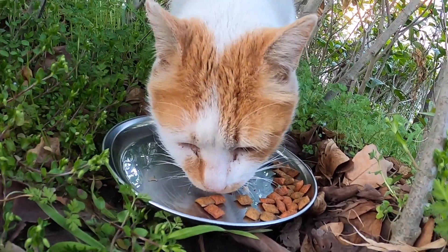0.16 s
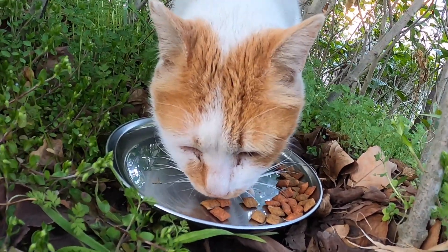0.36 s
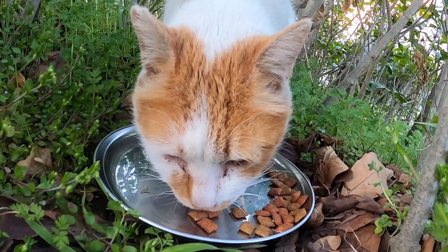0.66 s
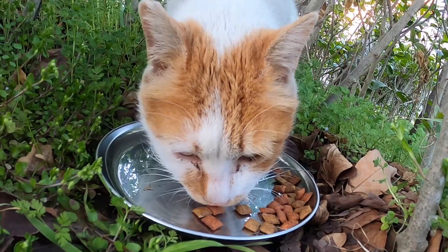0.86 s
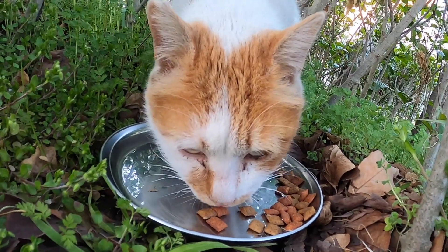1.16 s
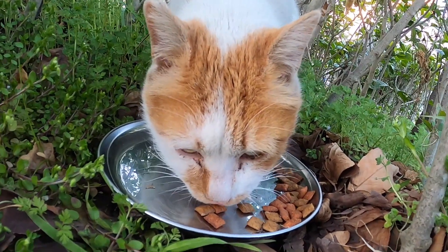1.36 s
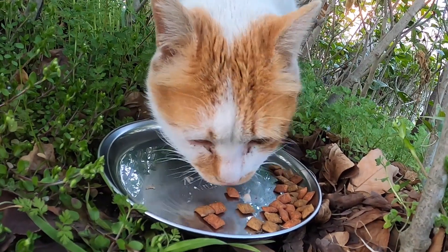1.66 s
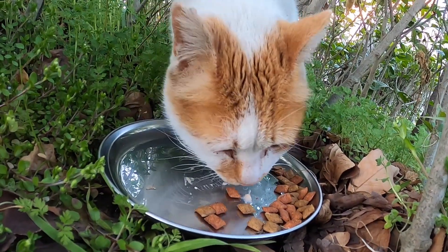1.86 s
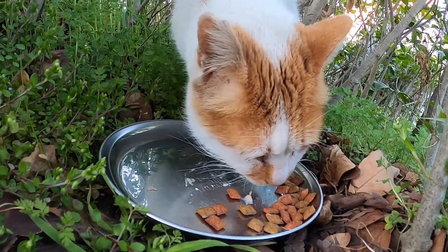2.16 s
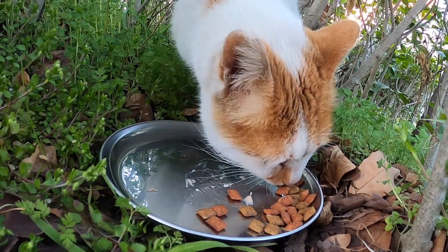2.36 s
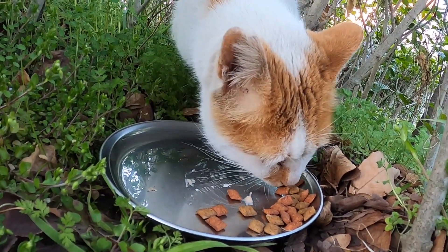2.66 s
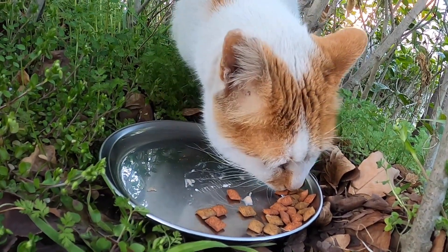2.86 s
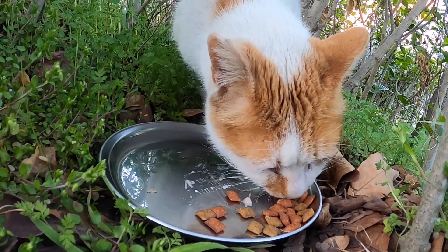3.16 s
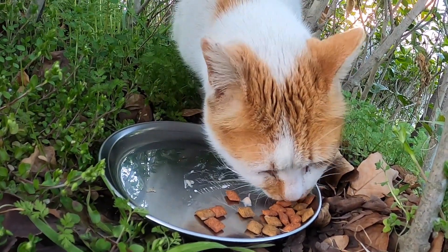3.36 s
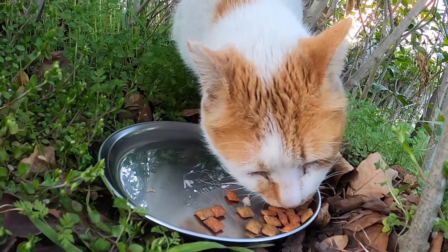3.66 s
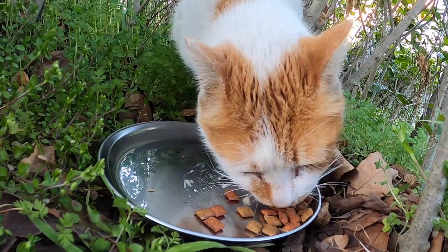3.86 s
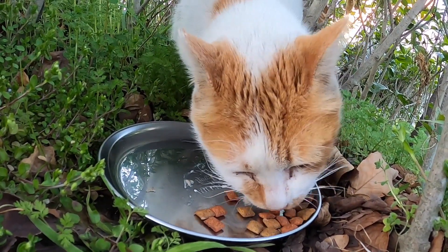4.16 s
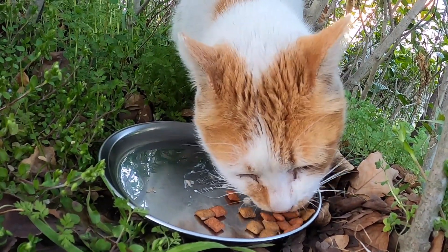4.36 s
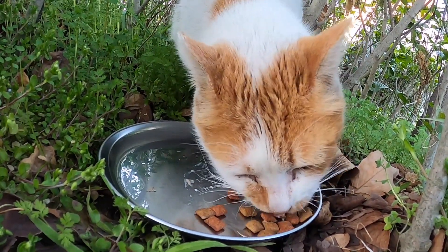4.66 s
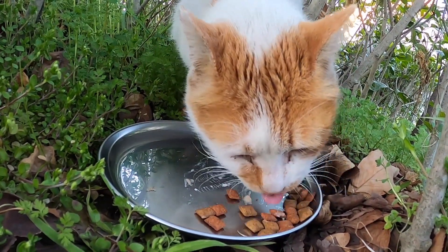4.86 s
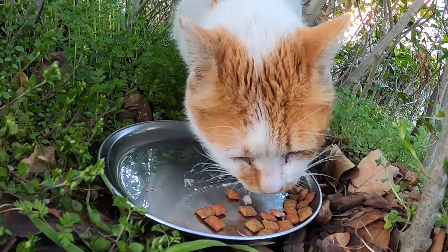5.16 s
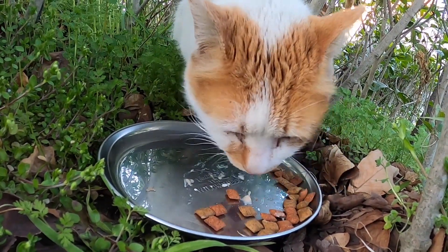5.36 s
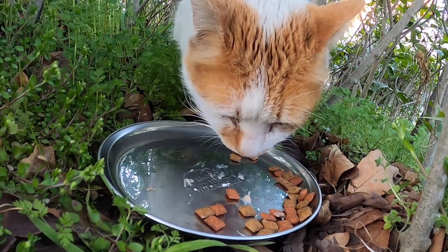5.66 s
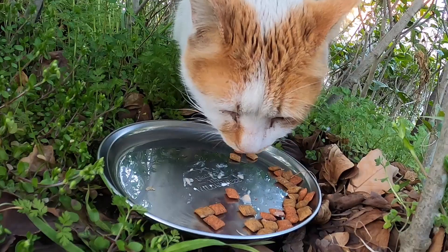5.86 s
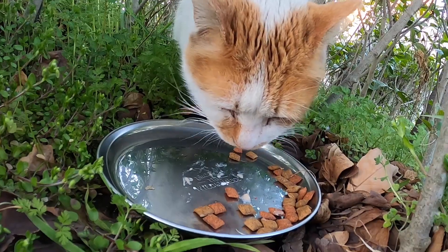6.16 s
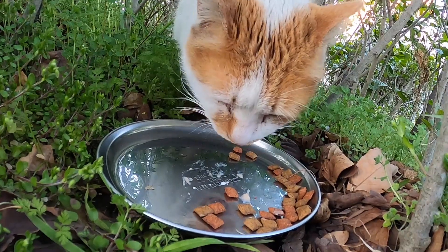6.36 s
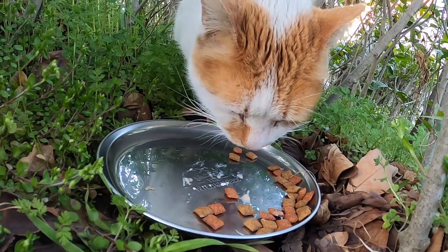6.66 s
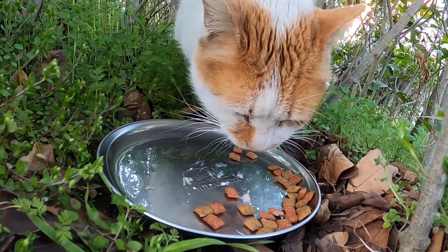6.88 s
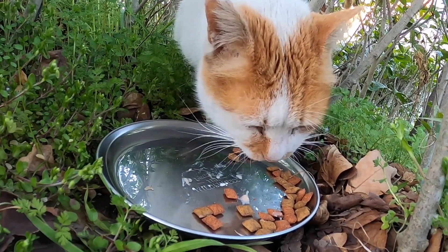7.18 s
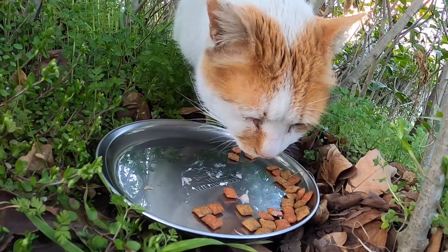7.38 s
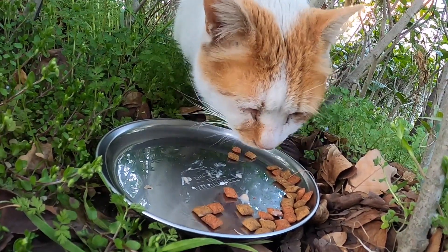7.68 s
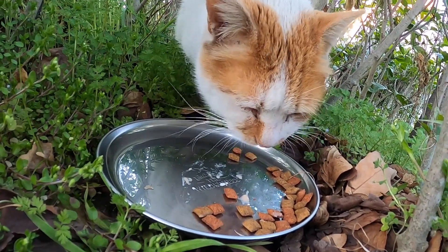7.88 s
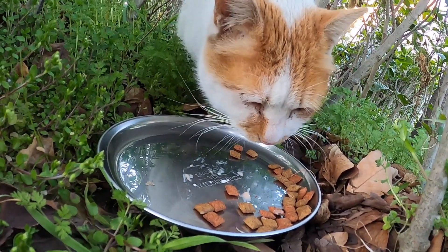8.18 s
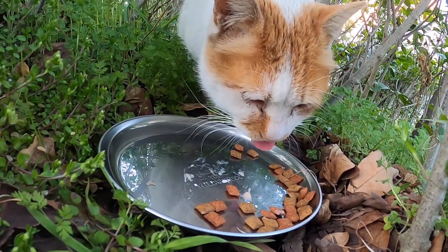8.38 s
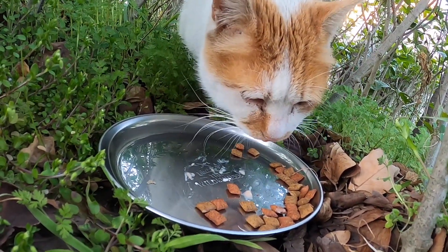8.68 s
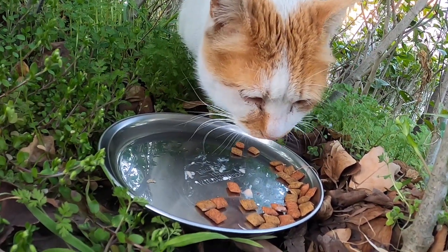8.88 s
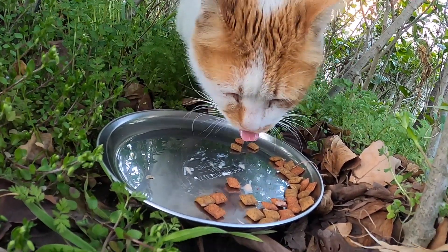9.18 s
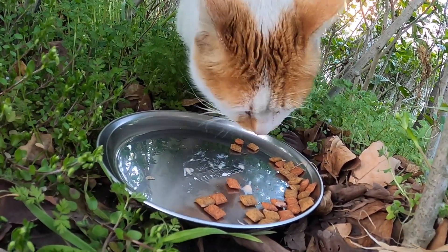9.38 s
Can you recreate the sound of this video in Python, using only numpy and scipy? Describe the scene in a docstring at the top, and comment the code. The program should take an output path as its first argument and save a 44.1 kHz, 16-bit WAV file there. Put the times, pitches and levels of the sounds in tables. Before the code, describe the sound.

Outdoors by a hedge, a heavy lorry's low engine drone pulls away and sinks in pitch, leaving steady tyre roar. Small dry twig-like ticks and a brief leaf crackle sound early on the left. A cat then bites dry kibble half a metre from a stereo microphone, in clusters of crisp cracks with light steel-dish rattles; the strongest crunch comes near seven seconds.

```python
"""A cat cracks dry kibble over a steel dish in a hedge: noisy clicks ring treble, jaw and mouth modes, and the
dish answers with ringing modes. Beyond the hedge a lorry draws away, its engine notes sinking, over tyre roar,
both made of banded noise with sine lines for the engines. Small dry ticks sound mostly on the left, with one
swell of leaf crackle and faint random scratches around them. Two microphone ports half a metre from the cat
hear it all."""
import sys
import numpy as np
from scipy import signal
from scipy.fft import rfft, irfft, next_fast_len
from scipy.io import wavfile
from scipy.ndimage import uniform_filter1d

SR = 44100
rng = np.random.default_rng(int(sys.argv[2]) if len(sys.argv) > 2 else 0)


def unload_audio(sound):
    """Save the sound as a 16-bit wav file, at the path given as the first command line argument."""
    columns = np.transpose(np.atleast_2d(sound))
    # keep every value between -1 and 1, then stretch to whole-number steps
    steps = np.round(np.clip(columns, -1, 1) * 32767)
    wavfile.write(sys.argv[1], SR, steps.astype(np.int16))


N = 420273
CAT_PAN_DB, CAT_LAG_S = -1.5, 3.3e-5  # left minus right; delay of the left port
SPLIT_SHARE = 0.6  # splits against the main click, in amplitude
BIGGEST_GRAIN = 3.5  # ceiling on a grain's level, in units of the mean scatter


def undb(db):
    """dB to gain."""
    return 10 ** (np.asarray(db) / 20)


def along(table):
    """Columns of a time curve, read at every sample."""
    s, *columns = np.transpose(table)
    return [np.interp(np.arange(N) / SR, s, c) for c in columns]


def over(table, hz):
    """A spectrum read on a log-frequency axis."""
    table_hz, values = np.array(table).T
    return np.interp(np.log(hz), np.log(table_hz), values)


def walk(rate):
    """A slow random wander: values held 1 / rate s, then smoothed twice."""
    hold = int(SR / rate)
    steps = np.repeat(rng.standard_normal(N // hold + 1), hold)
    return uniform_filter1d(uniform_filter1d(steps, hold), hold)[:N]


def ring(x, hz, t60):
    """One decaying mode, peaking near 1 for a unit click; t60 is its 60 dB decay in s."""
    pole = np.exp(2j * np.pi * hz / SR - np.log(1000) / (t60 * SR))
    return signal.lfilter([1], [1, -pole], x).imag


def place(x, pan_db):
    """Spread a sound to left and right; positive pan leans left."""
    return x * undb(np.array([[.5], [-.5]]) * pan_db)


def add(out, sound, s):
    """Mix a sound in at time s."""
    start = int(s * SR)
    out[:, start:start + sound.shape[1]] += sound


# Tyre roar spectrum: f/Hz, level/dB per Hz (relative)
ROAD = [(20, -19.5), (42, -3.5), (60, -3.5), (83, -5.5), (119, -8), (200, -14.5), (400, -23), (700, -27.5),
        (1000, -25), (1400, -32.5), (2000, -36.5), (2800, -48), (5500, -66), (10000, -78.5), (15500, -92)]
# Lorry noise spectrum: f/Hz, level/dB per Hz (relative)
LORRY = [(20, -23), (53, -1), (95, -9.5), (129, -3.5), (180, -14.5), (430, -20.5), (1400, -32.5),
         (2100, -33), (3300, -43.5), (6000, -58), (10000, -63), (15500, -78.5)]
# Stereo likeness of the noise: f/Hz, likeness of left and right/0-1
LIKENESS = [(130, 1), (290, 0.97), (640, 0.82), (1410, 0.63), (3100, 0.5), (6800, 0.18)]
# Road over time: t/s, level of 400-2000 Hz/dB, brightness above the knee/dB per octave,
# rumble added below the low knee/dB
TRAFFIC = [(1, -46.5, -12, -7.5), (2.3, -46, 0, 5.5), (3.3, -41.5, 0.5, -1.5), (4.4, -44.5, 2, 0.5),
           (5.7, -42, 2, -1.4), (7.1, -43, 2, -2), (8.2, -41.5, 2.5, -1.5), (9.53, -39.5, 3, -2)]
KNEE_HZ, LOW_KNEE_HZ = 1470, 257
LEFT_LAG_S = 5e-5
ROAD_PAN_DB = 3.5  # left minus right, in the treble
LORRY_DB, LORRY_BRIGHT_DB = -26.5, 2  # level and brightness (dB per octave) at the moment it leaves
LEAVES_S, FADE_DB_PER_S, DULLS_DB_PER_S = 0.98, 8.5, 2  # then it fades and its treble dulls
EASES_DB_PER_S, BRIGHTENS_DB_PER_S = 1, 1.7  # before it leaves, its body eases while the hiss grows


def traffic():
    """Tyre roar plus lorry noise in half-octave bands; bass alike at both ports, treble nearly unrelated."""
    size = next_fast_len(N)
    per_hz = SR / size
    hz = np.maximum(np.arange(size // 2 + 1) * per_hz, 1)
    like = np.clip(over(LIKENESS, hz), 0, .999)
    noise = rfft(rng.standard_normal((2, size))) * undb(over(ROAD, hz))
    mid, side = noise * np.sqrt([1 + like, 1 - like])
    left_delay = np.exp(-2j * np.pi * hz * LEFT_LAG_S)
    ports = np.array([(mid + side) * left_delay, mid - side])

    road_power, lorry_power = undb(2 * over(ROAD, hz)), undb(2 * over(LORRY, hz))
    road_rms = np.sqrt(np.sum(road_power[(hz > 400) & (hz < 2000)]) * per_hz)
    lorry_rms = np.sqrt(np.sum(lorry_power) * per_hz)
    road_db, bright, rumble_db = along(TRAFFIC)

    t = np.arange(N) / SR
    gone_s, until_s = np.maximum(t - LEAVES_S, 0), np.maximum(LEAVES_S - t, 0)
    lorry_db = LORRY_DB + EASES_DB_PER_S * until_s - FADE_DB_PER_S * gone_s
    lorry_bright = LORRY_BRIGHT_DB - BRIGHTENS_DB_PER_S * until_s - DULLS_DB_PER_S * gone_s

    out = 0
    for centre in 20 * 2 ** np.arange(0, 10, .5):
        share = np.clip(1 - 2 * np.abs(np.log2(hz / centre)), 0, 1)
        octaves = max(np.log2(centre / KNEE_HZ), 0)  # air takes the treble from what is far
        low = np.clip(np.log2(2 * LOW_KNEE_HZ / centre), 0, 1)  # 1 below the low knee, 0 an octave above
        road = undb(road_db + bright * octaves + low * rumble_db) / road_rms
        recolour_db = over(LORRY, centre) - over(ROAD, centre)  # the noise already has the road's colour
        lorry = undb(lorry_db + lorry_bright * octaves + recolour_db) / lorry_rms
        band = irfft(ports * share, size)[:, :N] * np.hypot(road, lorry) * undb(1.37 * walk(6))
        out = out + place(band, 0.65 * low + (1 - low) * min(octaves, 1) * ROAD_PAN_DB)
    return out * np.sqrt(SR / 2) / np.sqrt(2)


# Engine notes: t/s, firing f/Hz, level/dB
# Engine lines: multiple of the firing rate, level/dB on top of the note, drift/dB per s
LORRY_ENGINE = [(0, 63, -25), (.6, 63, -33.5), (.9, 62, -24.5), (1.32, 62, -31), (1.42, 57.5, -31.5),
                (2.02, 55.5, -33), (2.17, 51, -29), (2.7, 50.5, -33), (3.2, 48.5, -36), (3.8, 47.5, -37)]
LORRY_LINES = [(1, 1, -4.5), (2, -1.5, -0.88), (3, -10, 0.9), (4, -17, 3), (5, -19, 2)]
SECOND_ENGINE = [(0, 85, -41.5), (1.5, 82.7, -33.5), (2.6, 79.4, -43), (4, 76.1, -43)]
SECOND_LINES = [(1, 1.5, 0.49), (2.03, -2.5, -0.75), (4.059, -10.5, -1.5), (4.8, -11, -1.8)]
FAR_ENGINE = [(3.8, 54.1, -34), (4.35, 57.2, -33.5), (6.4, 58.62, -34.5), (6.8, 60.82, -35),
              (9.1, 57.12, -36.5), (9.53, 54.4, -38)]
FAR_LINES = [(1, -1.5, 0), (2, -8.5, 0.0073), (3, -12, 0.01)]


def engines():
    """Each engine hums a few lines tied to its firing rate, which waver in pitch and level."""
    out, t = 0, np.arange(N) / SR
    pairs = (LORRY_ENGINE, LORRY_LINES), (SECOND_ENGINE, SECOND_LINES), (FAR_ENGINE, FAR_LINES)
    for note, lines in pairs:
        hz, db = along(note)
        first_s, last_s = note[0][0], note[-1][0]
        fade = np.clip(np.minimum(t - first_s + 0.07, last_s + 0.11 - t) / 0.13, 0, 1)
        phase = 2 * np.pi * np.cumsum(hz * (1 + 0.008 * walk(9))) / SR
        for k, (multiple, rel_db, drift_db) in enumerate(lines):
            line_db = db + rel_db + drift_db * np.clip(t - first_s, 0, last_s - first_s)
            level = np.sqrt(2) * fade * undb(line_db + 4.0 * walk(5))
            out = out + level * np.sin(multiple * phase + k)
    return place(out, 1.35)


# Base level of the faint scratches, before each one's random size: t/s, level/dB
NIBBLES = [(1.6, -58), (2, -77), (3.4, -75), (7.4, -72), (8.1, -58)]


def nibbling(per_s=30, scatter_db=3.5):
    """Faint licks, crumbs and leaf ticks at random: short noise scratches, each with its own colour and side."""
    out, t = np.zeros((2, N + SR)), np.arange(SR // 50) / SR
    for when, pitch, side, size, length in rng.random((int(per_s * N / SR), 5)):
        scratch = rng.standard_normal(len(t)) * np.exp(-t / (.001 + 0.0055 * length))
        hz = 4500 * 2 ** (1.1 * pitch)
        for _ in range(3):
            scratch = signal.lfilter(*signal.iirpeak(hz, 1.5, fs=SR), scratch)
        base_db = np.interp(when * N / SR, *np.transpose(NIBBLES))
        gain = undb(base_db - scatter_db * np.log(size + 0.067))  # many small, a few large
        start = int(when * N)
        out[:, start:start + len(t)] += place(scratch * gain, 8 * side - 2.5)
    return out[:, :N]


# Treble modes before each call's shift and widening: f/Hz, width/Hz
# The first is the snap, the last three the fizz.
JAW = [(4500, 500), (6500, 1000), (7500, 790), (9500, 660), (12000, 1300)]


def shells(blow, snap_db, fizz_db, detune, higher=0.96, wider=0.89, snap_hz=JAW[0][0]):
    """Short treble resonances struck by a blow; wider modes die sooner, and each piece shifts them."""
    shift = higher + detune * rng.standard_normal(len(JAW))
    shift[0] *= snap_hz / JAW[0][0]
    gains = undb([snap_db, snap_db - 19.0, fizz_db, fizz_db - 2.0, fizz_db - 0.5])
    sound = 0
    for k, (hz, width) in enumerate(JAW):
        t60 = np.log(1000) / (np.pi * width * wider)
        sound = sound + (-1) ** k * gains[k] * ring(blow, hz * shift[k], t60)
    return signal.sosfilt(signal.butter(2, 2500, "high", fs=SR, output="sos"), sound)


RUSTLE_S, RUSTLE_DECAY_S = 0.725, 0.042  # time of the peak; 1/e time of the rise and the fall
RUSTLE_DB, RUSTLE_FIZZ_DB, RUSTLE_PAN_DB = -58, -56, 11


def rustle():
    """A short swell of dense dry crackle in the leaves: uneven noise grains through the treble modes."""
    t = np.arange(-SR // 4, SR // 4) / SR
    grains = rng.standard_normal((2, len(t))) * undb(2.7 * rng.exponential(1, len(t)))
    grains *= np.exp(-np.abs(t) / RUSTLE_DECAY_S)
    crackle = shells(grains, RUSTLE_DB, RUSTLE_FIZZ_DB, 0, higher=0.98, wider=3.1)
    out = np.zeros((2, N + SR))
    add(out, place(crackle, RUSTLE_PAN_DB), RUSTLE_S + t[0])
    return out[:, :N]


def shower(crumbs_db, break_s, split, t60, scatter_db, apart):
    """One main click amid the splits of a short break, then dying crumbs; each port hears part of it alone."""
    t = np.arange(SR // 6) / SR - 2 * break_s
    sizes = np.minimum(rng.exponential(1, len(t)), BIGGEST_GRAIN)
    noise = rng.standard_normal((3, len(t))) * undb(scatter_db * sizes)
    grains = noise[0] + apart * noise[1:]
    splits = grains * np.exp(-(t / np.where(t < 0, break_s / 2, break_s)) ** 2)
    splits *= split / np.sqrt(np.sum(splits ** 2) / 2)  # set by energy, averaged over the ports
    decay = np.exp(-np.log(1000) * np.maximum(t, 0) / t60) * (t > 0)
    blow = splits + grains * undb(crumbs_db) * decay
    blow[:, int(2 * break_s * SR)] = 1.0  # the main click
    return blow


# Dry ticks: t/s, snap level/dB, fizz level/dB, left minus right/dB
TICKS = [(0.7126, -34, -27, 10), (0.732, -52, -48, 9), (0.8237, -37.5, -50, 12.5), (0.853, -44.5, -49, 12),
         (0.887, -35, -49, 13), (0.922, -49, -37, 11), (1.341, -42, -41, 13), (1.471, -43, -43, 9),
         (1.488, -48, -40, 11), (1.5584, -50, -48, 11), (2.9724, -49, -40, 10), (4.838, -53, -55, 15),
         (7.2493, -50, -50, -7), (8.702, -58, -49, 5), (9.183, -50, -59, 11), (9.2147, -53, -52, 12),
         (9.23, -49, -58, 13)]
TICK_CRUMBS_DB = -23.5  # against the main click


def ticks(break_s=0.00046):
    """Dry ticks, most of them on the left: small breaks through wide, short treble modes."""
    out = np.zeros((2, N + SR))
    for s, snap_db, fizz_db, pan_db in TICKS:
        blow = shower(TICK_CRUMBS_DB, break_s, split=SPLIT_SHARE, t60=0.041, scatter_db=4.5, apart=0.94)
        tick = shells(blow, snap_db, fizz_db, 0.12, higher=1.1, wider=3.7)
        add(out, place(tick, pan_db), s - 2 * break_s)
    return out[:, :N]


# Bites: t/s, snap level/dB, fizz level/dB, jaw ring level/dB, mouth ring level/dB, mouth f/Hz,
# snap f/Hz (before the shift in shells), grit level/dB
CRUNCH = [(3.5535, -45, -48, -44, -60, 1300, 4730, -60), (3.7575, -51, -64, -38, -62, 2250, 5100, -68),
          (4.041, -45, -71, -35, -65, 2350, 5150, -70), (4.2004, -41, -60, -46, -46, 1300, 5650, -62),
          (4.2337, -30, -36, -25.5, -34, 1980, 5470, -44), (4.24, -45, -51, -36, -28, 2010, 4000, -56),
          (4.2458, -47, -53, -40, -31.5, 2100, 4100, -44), (4.274, -50, -62, -45, -37, 2000, 3900, -57),
          (4.2894, -49, -62, -37, -37, 1950, 4800, -51), (4.696, -31, -46, -31, -30, 2300, 4230, -37),
          (4.6991, -33, -45, -31, -33, 2300, 5100, -40), (4.706, -27, -44, -26, -27, 1900, 4500, -32),
          (5.0324, -46, -53, -51, -59, 2300, 5100, -62), (5.8154, -52, -58, -46, -65, 1300, 4500, -64),
          (6.198, -34.5, -35.5, -38, -27, 1586, 4660, -47), (6.4662, -47, -61, -30.5, -40, 1400, 4900, -59),
          (6.498, -58, -58, -42, -30, 1950, 4500, -61), (6.5287, -43, -37.5, -32, -26, 1850, 4650, -51),
          (6.535, -52, -50, -48, -34, 1800, 4770, -58.5), (6.568, -51, -43, -42, -44, 1300, 4900, -53),
          (6.5898, -58, -57, -56, -50, 2040, 6300, -64), (6.7816, -37, -55, -32, -33, 1600, 4900, -64),
          (6.8223, -53, -45, -41, -31, 1450, 4750, -67), (6.8485, -57, -70, -43, -50, 1450, 4820, -66),
          (6.8747, -23, -33.5, -14.5, -19, 1340, 4550, -46),
          (6.9062, -26.5, -50, -35, -19.5, 1320, 4470, -58), (6.908, -30, -47, -34, -33, 1320, 4500, -58),
          (7.288, -43.5, -62, -48, -65, 1280, 4840, -65), (7.5631, -46, -52, -56, -45, 1240, 4470, -64),
          (7.988, -36, -37, -26, -20, 1610, 4500, -51), (7.9956, -45, -46, -33, -45, 1500, 4470, -58)]
CLACK_HZ, CLACK_PER_MOUTH = 1756, 0.75  # the upper jaw ring rises with the mouth ring
CLACK_RING_SHARE = 0.72  # the jaw ring dies sooner than the mouth ring
MOUTH_T60_S, MOUTH_REF_HZ = 0.018, 1420  # a wider mouth rings higher and shorter
CRUMBS_DB, CRUMBS_PER_SNAP = -33.5, -0.25  # crumbs at a -41 dB snap; hard snaps leave relatively fewer
BONE_SHARE = 0.45  # how much of the splits the bone feels
GRIT_HZ = (1500, 6000)


def crunching(break_s=0.0009):
    """Teeth split the kibble and grind out grit; jaw and mouth add two lower rings that move with the bite."""
    out = np.zeros((2, N + SR))
    push = np.hanning(9) / 4  # the jaw takes the break as a longer, softer push
    main = int(2 * break_s * SR)
    jaw_cut = signal.butter(4, 1000, "high", fs=SR, output="sos")
    grit_band = signal.butter(2, GRIT_HZ, "band", fs=SR, output="sos")
    for s, snap_db, fizz_db, clack_db, knock_db, knock_hz, snap_hz, grit_db in CRUNCH:
        t60 = MOUTH_T60_S * (MOUTH_REF_HZ / knock_hz) ** 1.8
        clack_hz = CLACK_HZ + CLACK_PER_MOUTH * knock_hz
        crumbs_db = CRUMBS_DB + CRUMBS_PER_SNAP * (snap_db + 41)
        blow = shower(crumbs_db, break_s, split=SPLIT_SHARE, t60=0.055, scatter_db=5.0, apart=0.89)
        early = np.arange(blow.shape[1]) < 2 * main

        push_in = BONE_SHARE * blow * early
        push_in[:, main] = blow[:, main]  # the main click reaches the bone in full
        soft = signal.lfilter(push, [1], push_in)
        clack = undb(clack_db) * ring(soft, clack_hz, CLACK_RING_SHARE * t60)
        knock = undb(knock_db) * ring(soft, knock_hz, t60)
        jaw = signal.sosfilt(jaw_cut, clack + knock)

        # taking out the crumb level lets the bite's own grit level rule
        grit = undb(grit_db - crumbs_db) * signal.sosfilt(grit_band, blow * ~early)
        treble = shells(blow, snap_db, fizz_db, 0.013, snap_hz=snap_hz)
        add(out, place(jaw - treble + grit, CAT_PAN_DB), s - 2 * break_s)
    return out[:, :N]


# Main steel modes: f/Hz, level/dB, 60 dB decay/s
DISH = [(3490, -12, .09), (4650, -8, 0.11), (5227, -5, 0.1), (6000, -10, .1), (7004, -11, 0.25),
        (9065, -15, .14)]
# Kibble on steel: t/s, level of the rattle's energy/dB
CLINKS = [(3.554, -69), (3.758, -73), (4.042, -75), (4.292, -70), (4.52, -73), (4.699, -48), (4.707, -44)]


def dish(rattle_s=0.004, dense_db=-6, dense_t60=0.11):
    """Hard kibble rattles on the steel: a few modes ring over a dense crowd of modes with one decay."""
    blows, t = np.zeros(3 * SR // 2), np.arange(SR // 20) / SR
    start = CLINKS[0][0]
    for s, db in CLINKS:
        at = int((s - start) * SR)
        rattle = rng.standard_normal(len(t)) * np.exp(-t / rattle_s)
        blows[at:at + len(t)] += undb(db) * rattle / np.sqrt(np.sum(rattle ** 2))
    crowd = []
    for u, v in rng.random((160, 2)):
        crowd.append((1800 + 11000 * u, dense_db - 14 * u + 6 * (v - .5), dense_t60))
    steel = sum(undb(db) * ring(blows, hz, t60) for hz, db, t60 in DISH + crowd)
    out = np.zeros((2, N + SR))
    add(out, place(steel, CAT_PAN_DB), start)
    return out[:, :N]


def scene():
    """All sources at the two microphone ports."""
    cat = crunching() + dish()
    late = np.sinc(np.arange(17) - 8 - CAT_LAG_S * SR) * np.hanning(17)
    cat[0] = np.convolve(cat[0], late, "same")  # the cat is nearer the right port
    return traffic() + engines() + nibbling() + rustle() + ticks() + cat


# Resonances of the microphone ports: f/Hz, width/Hz, level/dB
PORTS = [(5090, 4200, 4), (9200, 1170, 3.5)]
TOP_HZ = 15600


def record(dry):
    """The microphone ports lift two treble bands and fade above them; a steep low-pass cuts the top."""
    for hz, width, db in PORTS:
        dry = dry + (undb(db) - 1) * signal.lfilter(*signal.iirpeak(hz, hz / width, fs=SR), dry)
    dry = signal.sosfilt(signal.butter(2, 13000, fs=SR, output="sos"), dry)
    return signal.sosfilt(signal.ellip(10, .2, 70, TOP_HZ, fs=SR, output="sos"), dry)


dry = scene()
out = record(dry)
unload_audio(out)
```